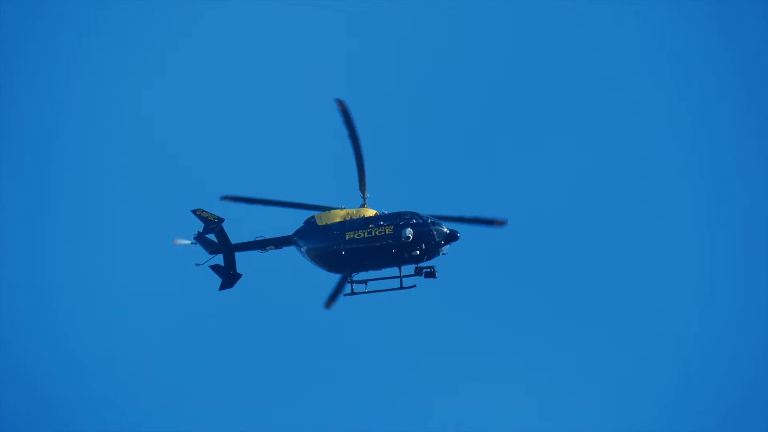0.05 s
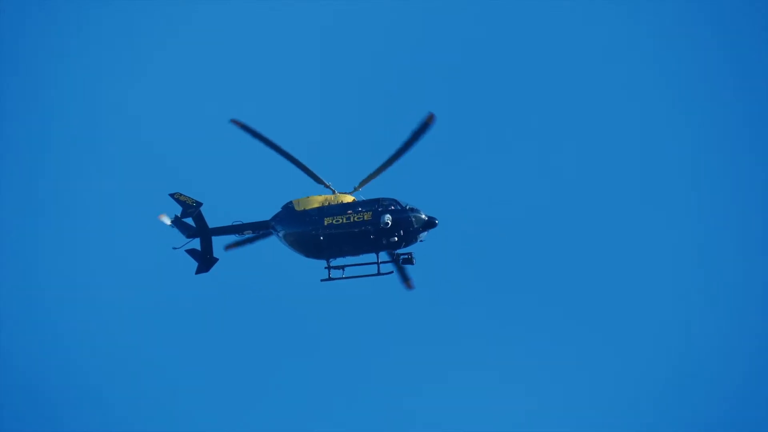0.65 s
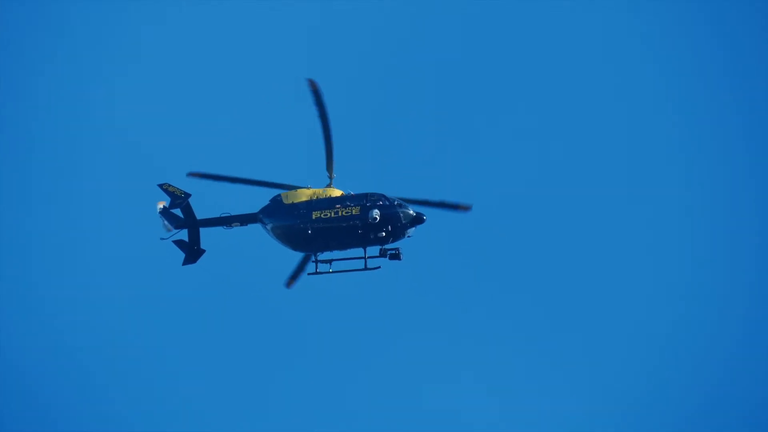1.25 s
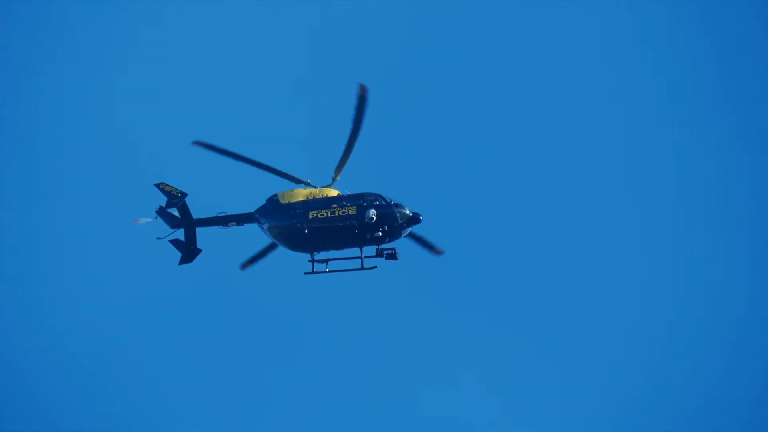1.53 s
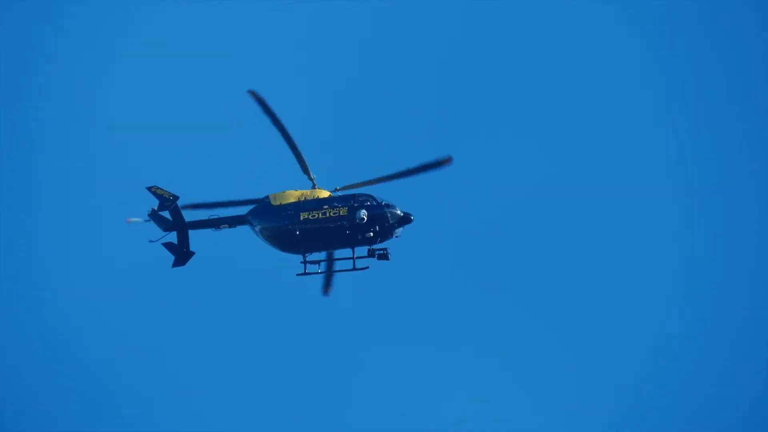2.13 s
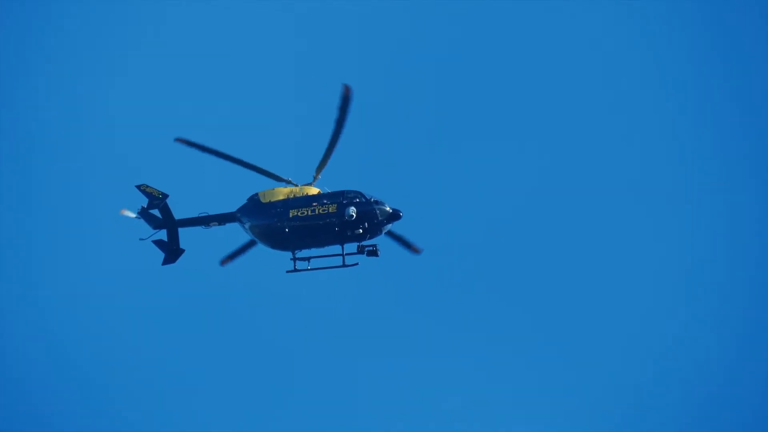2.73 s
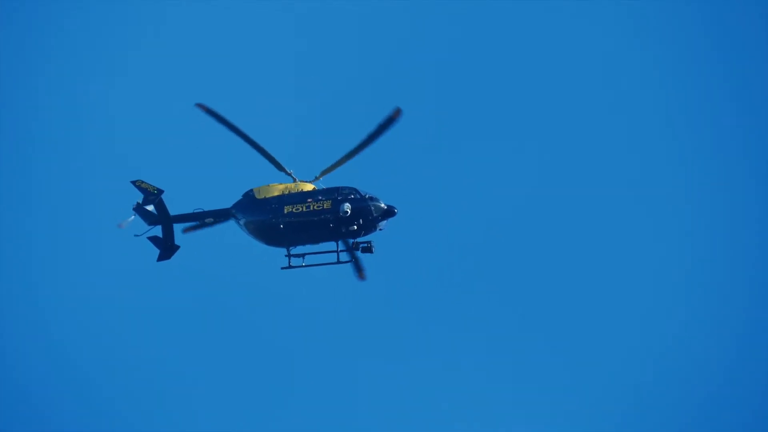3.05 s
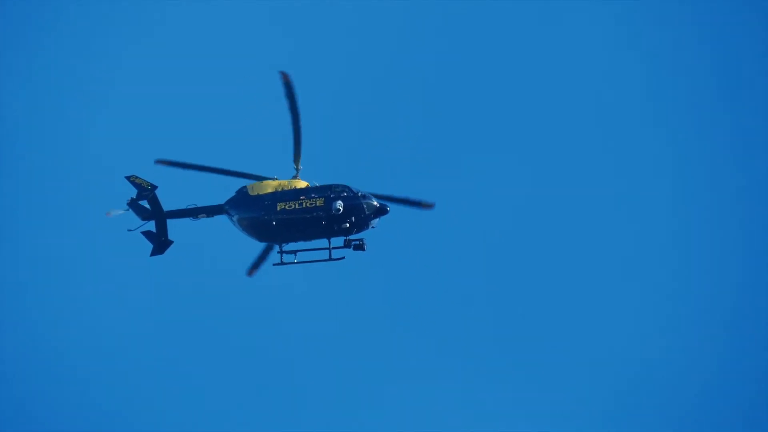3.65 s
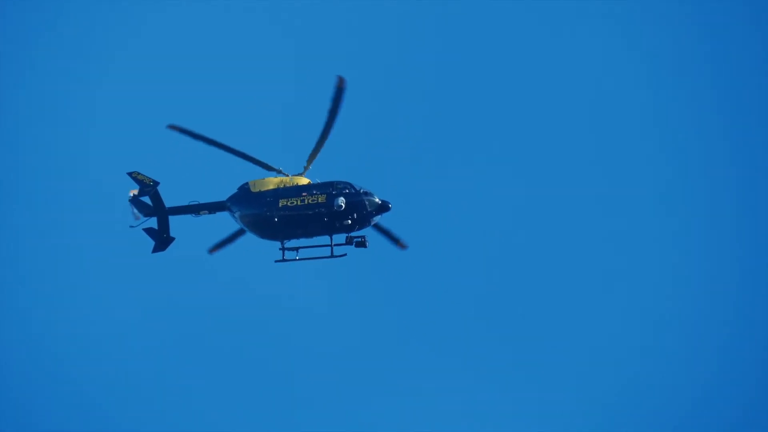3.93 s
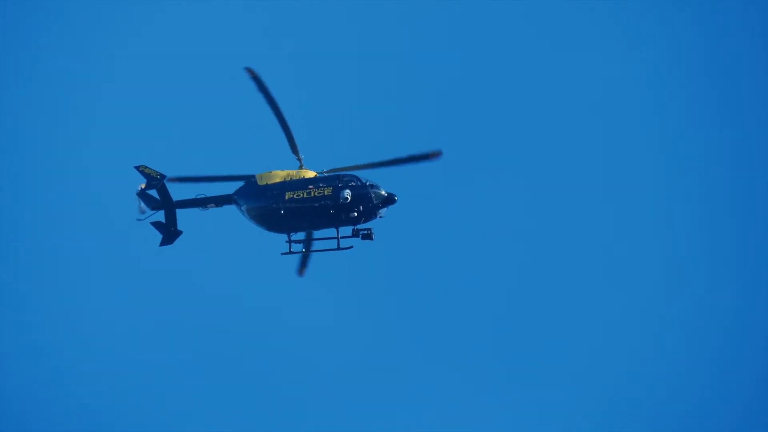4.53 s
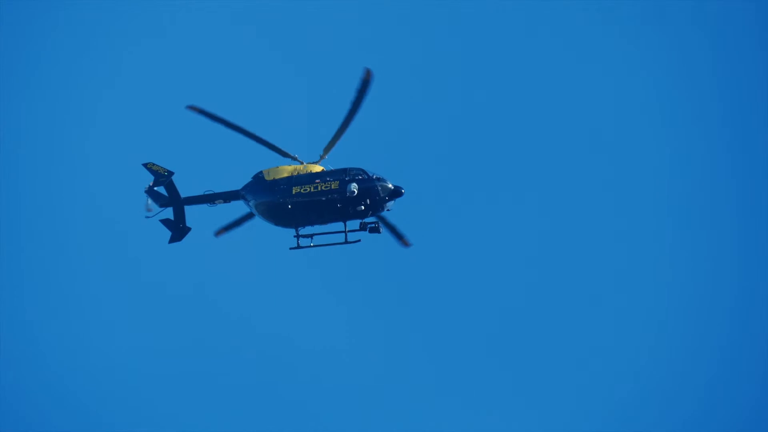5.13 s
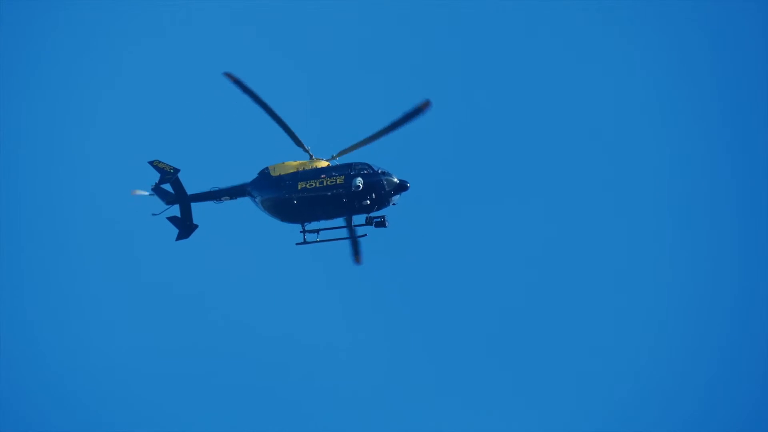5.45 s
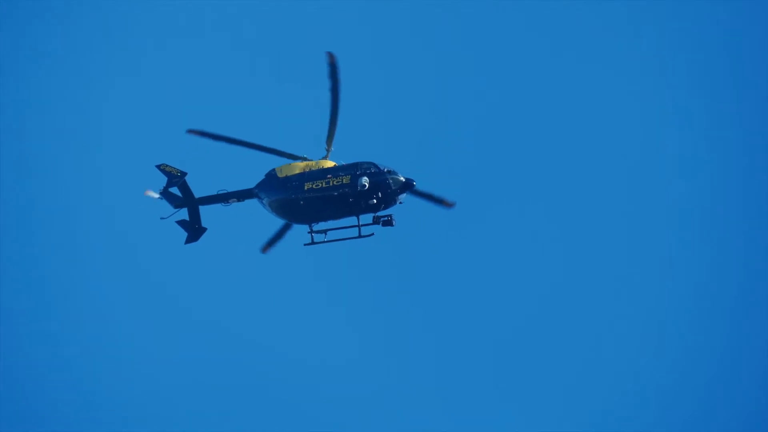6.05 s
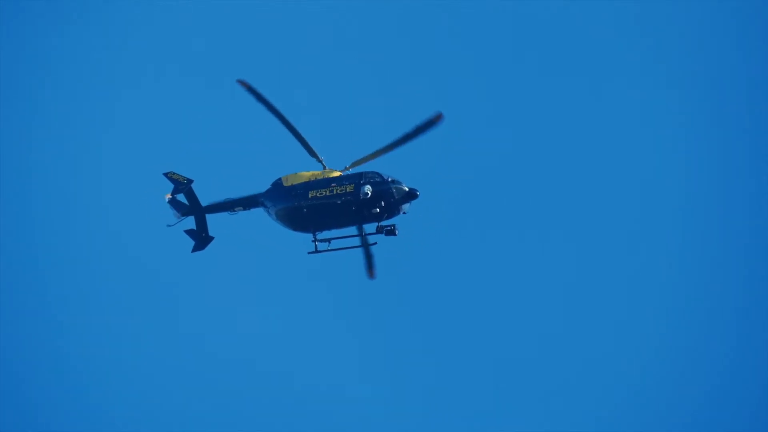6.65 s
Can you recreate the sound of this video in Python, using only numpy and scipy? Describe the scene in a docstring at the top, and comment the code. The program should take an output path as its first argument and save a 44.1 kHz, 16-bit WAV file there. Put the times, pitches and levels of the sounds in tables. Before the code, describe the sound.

A helicopter hovers overhead in the open air. Its main rotor throbs and swishes in a rapid chop while the tail rotor hums above it, swelling and easing slightly. Sharp blade slaps come irregularly, clustering around three and five seconds. A small bird chirps very faintly in the distance midway, and a thin zoom motor whir starts close to the microphone for the last two seconds.

```python
"""A helicopter hovers overhead, swaying a little: its main rotor throbs, roars and swishes as the
blades cut turbulent air, and now and then slaps its own wake. The tail rotor drones above the throb.
A small bird chirps far off, and the gears of a camera's zoom motor whir faintly, most near the end."""
import sys
import numpy as np
from scipy import signal
from scipy.fft import rfft, irfft
from scipy.io import wavfile
from scipy.ndimage import uniform_filter1d

SR = 44100
rng = np.random.default_rng(int(sys.argv[2]) if len(sys.argv) > 2 else 0)


def waveform_to_disk(signal):
    """Save audio, clipped to [-1, 1], as 16-bit WAV at the path in sys.argv[1]."""
    frames = np.transpose(np.atleast_2d(signal))
    scaled = np.clip(frames, -1, 1) * 32767
    samples = np.round(scaled).astype(np.int16)
    wavfile.write(sys.argv[1], SR, samples)


N = 298998
TIME, FREQ = np.arange(N) / SR, np.fft.rfftfreq(N, 1 / SR)
MAIN_HZ, TAIL_HZ = 25.78, 72.92  # blade passes a second


def amp(db):
    """Decibels to gain."""
    return 10 ** (np.asarray(db) / 20)


def unit(x):
    """Scales to rms 1."""
    return x / np.sqrt(np.mean(abs(x) ** 2) + 1e-20)


def curves(rows):
    """One envelope for each value column of a time table."""
    times, *columns = np.transpose(rows)
    return [np.interp(TIME, times, c) for c in columns]


def spectra(rows, hz):
    """One curve for each value column of a frequency table, read on a log axis."""
    freqs, *columns = np.transpose(rows)
    return [np.interp(np.log(hz + 1), np.log(freqs + 1), c) for c in columns]


def wander(rate):
    """Smooth random modulation of rms 1 that changes about rate times a second."""
    t = np.linspace(0, N / SR, num=3000)
    hz = rate * np.geomspace(1 / 10, 1, num=12)[:, None]
    waves = np.sin(2 * np.pi * (hz * t + rng.random(hz.shape)))
    return np.interp(TIME, t, unit(waves.sum(0)))


def eddies(grain_db):
    """Two streams of noise broken into grains a few milliseconds long."""
    grains = unit(uniform_filter1d(rng.standard_normal(N), size=110))
    return rng.standard_normal((2, N)) * amp(grain_db * grains)


def churn(pair, shape, patchy_db, drift):
    """A restless EQ, as through turbulent air: the curve slides to and fro, patches swell and sink."""
    hz, times, frames = signal.stft(pair, SR, nperseg=1024)
    patches = uniform_filter1d(rng.standard_normal(frames.shape[1:]), size=4, axis=0)
    patches = unit(uniform_filter1d(patches, size=16, axis=1))
    slide = np.exp(drift * np.interp(times, TIME, wander(3)))
    eq_db = spectra(shape, hz[:, None] * slide)[0] + patchy_db * patches
    return signal.istft(frames * amp(eq_db), nperseg=1024)[1][:, :N]


def harmonics(blade_hz, orders, flutter, flutter_rate, start=0):
    """A rotor's partials, scattered in phase; the higher ones flutter more in the disturbed air."""
    out, passes = np.zeros(N), blade_hz * TIME + start
    for k, db in orders:
        stray = flutter * k * (wander(flutter_rate) + 1j * wander(flutter_rate))
        partial = np.exp(2j * np.pi * (k * passes + 0.5 * rng.random()))
        out += amp(db) * unit(((1 + stray) * partial).real)
    return out


# stereo image of the two microphone ports: f/Hz, coherence, left lead/rad, left minus right/dB
STEREO_IMAGE = [(450, .98, .15, .5), (650, .89, .4, 1.2), (900, .78, .2, 5), (1150, .6, -1, 4.4),
                (1400, .6, -.3, 1.6), (1700, .2, -2.2, 0), (2000, .55, -.3, -2.7), (2900, .28, -2.3, 2),
                (4500, .18, -.8, -2)]

def mic_ports(pair):
    """Two unrelated sounds become left and right: mono in the bass, wide in the treble."""
    coherence, phase, tilt_db = spectra(STEREO_IMAGE, FREQ)
    width = 1 - np.exp(-(FREQ / 400) ** 3)
    shared = 1 - width * (1 - np.clip(coherence, 0, 1))
    left, other = rfft(pair)
    right = (shared * left + np.sqrt(1 - shared ** 2) * other) * np.exp(-1j * phase * width)
    tilt = amp(width * tilt_db / 2)
    return irfft(np.array([left * tilt, right / tilt]), N)


# distant chirps: t/s, length/s, top pitch/Hz, level/dB
CHIRPS = [(0.25, 0.16, 6300, -83), (3.73, 0.22, 6300, -72)]

def bird(waver=.035, top_s=0.04, bend_hz_per_s2=44000, ramp_s=0.014, fade_db=-12):
    """Thin, hoarse whistles that reach their top pitch early, then fall and fade."""
    out = np.zeros(N)
    hoarse = 1 + waver * unit(uniform_filter1d(rng.standard_normal(N), size=30))
    for start, length, top_hz, db in CHIRPS:
        t = np.clip(TIME - start, 0, length)
        hz = top_hz - bend_hz_per_s2 * (t - top_s) ** 2
        gate = np.minimum(np.minimum(t, length - t) / ramp_s, 1)
        whistle = unit(np.sin(2 * np.pi * np.cumsum(hz * hoarse) / SR))
        out += gate * amp(db + fade_db * (t / length) ** 2) * whistle
    return out


# gear whine of each motor run: t/s, length/s, level/dB
ZOOM_RUNS = [(0, 1.4, -76), (4.91, 2.3, -62.5), (5.14, .3, -67.5)]
# rush of each fast lens move: t/s, length/s, level/dB
LENS_SPURTS = [(.04, .075, -83), (5.013, .16, -63), (6.652, .19, -62)]
# resonances of the lens housing: f/Hz, width/Hz, relative level/dB
HOUSING_MODES = [(4680, 350, 1), (5200, 60, 3), (9070, 480, -14.5), (11050, 1100, -16)]
# EQ of the moving lens's rush: f/Hz, gain/dB
RUSH_EQ = [(3500, -10.5), (4800, -0.5), (6300, -2), (8500, 0), (11300, -3.5), (14500, -25.5)]

def zoom_motor(attack_s=.06, fade_db_per_s=3.5, spurt_ramp_s=0.041, rattle_db=3.5, glide_db=-7):
    """Tiny gear teeth rattle the housing into a slowly fading whine; the moving lens adds a rush."""
    whine_gain, spurt_gain = np.zeros((2, N))
    for start, length, db in ZOOM_RUNS:
        since = np.maximum(TIME - start, 0)
        whine_gain += np.minimum(since / attack_s, 1) * amp(db - fade_db_per_s * since) * (since < length)
    for start, length, db in LENS_SPURTS:
        inside_s = np.minimum(TIME - start, start + length - TIME)
        spurt_gain += amp(db) * np.clip(inside_s / spurt_ramp_s, 0, 1)
    mid, side = eddies(grain_db=0.5) * amp(1.6 * wander(110))
    teeth = mid + 0.61 * np.array([side, -side])
    ringing = 0
    for hz, width, db in HOUSING_MODES:
        rattle = teeth * amp(rattle_db * wander(140))
        ringing += rfft(rattle) * amp(db) / (1 + (2 * (FREQ - hz) / width) ** 2)
    rush = unit(churn(teeth, RUSH_EQ, patchy_db=3.0, drift=.015))
    return unit(irfft(ringing, N)) * whine_gain + rush * (spurt_gain + amp(glide_db) * whine_gain)


# tail rotor partials: harmonic number, level/dB
TAIL_PARTIALS = [(1, -53.5), (2, -40.5), (4, -42), (5, -38.5), (6, -38.5), (7, -40)]
# envelope of the drone, the tail rotor's third harmonic: t/s, level/dB
DRONE_LEVEL = [(0.54, -28.5), (1.42, -22.5), (1.51, -31.5), (1.72, -23), (2.48, -22), (3.07, -22),
               (3.15, -29), (3.3, -33.5), (3.46, -21), (3.78, -26.5), (3.95, -25.5), (4.24, -34.5),
               (4.33, -21.5), (4.42, -37.5), (4.48, -22), (4.66, -19), (4.87, -27.5), (5.2, -30),
               (5.38, -24.5), (5.66, -27), (5.8, -35)]

def tail_rotor():
    """Fast pressure pulses merge into a hum; its third harmonic fades in and out on the way down."""
    hum = harmonics(TAIL_HZ, TAIL_PARTIALS, flutter=0.14, flutter_rate=7.0)
    drone = harmonics(TAIL_HZ, [(3, 0)], flutter=0.07, flutter_rate=11.0)
    return hum + drone * amp(curves(DRONE_LEVEL)[0])


# sway of the main rotor disc: t/s, lead of the beat/blade passes, chop depth factor
DISC_SWAY = [(0.0, 0.31, 1.1), (0.94, 0.55, 0.84), (2.31, 0.66, 0.95), (2.67, 0.78, 0.98),
             (3.45, 0.79, 0.64), (3.87, 0.44, 0.73), (5.29, 0.74, 1), (5.57, 0.55, 0.8), (6.15, 0.58, 1.2),
             (6.76, 0.34, 0.36)]

def blade_chop(lead, depth_db, skew, peak, uneven_db):
    """Gain that rises quickly as each blade comes round and sinks more slowly; no two passes match."""
    disc_lead, chop = curves(DISC_SWAY)
    passes = MAIN_HZ * TIME + disc_lead + lead
    angle = 2 * np.pi * passes
    beat = np.cos(angle) - skew * np.sin(2 * angle) + peak * (np.cos(2 * angle) + np.cos(3 * angle) / 2)
    accent = rng.standard_normal(N)[np.round(passes).astype(int)]
    return amp(chop * (depth_db * beat + uneven_db * accent * (1 + np.cos(angle)) / 2))


# blade loading, swelling and easing in the hover: t/s, wake fader/dB, swish fader/dB
BLADE_LOAD = [(0.0, -21.5, -30.5), (0.5, -25.5, -28.5), (0.68, -22, -29), (0.94, -22, -31.5),
              (1.34, -17.5, -30.5), (1.55, -19.5, -28), (1.82, -17, -26.5), (2.55, -18, -27),
              (3.15, -20.5, -30.5), (3.5, -21, -31.5), (3.97, -18, -27), (4.15, -15.5, -27.5),
              (4.47, -18.5, -27), (4.69, -18.5, -27.5), (5.09, -22.5, -31.5), (5.6, -22, -28.5),
              (6.03, -22.5, -29), (6.45, -25, -32)]
# EQs of the wake's roar and the blades' swish: f/Hz, gain/dB
ROAR_EQ = [(40, -52.5), (85, -25), (125, -18.5), (165, -7.5), (200, -5.5), (260, -2), (350, 1), (500, 0),
           (570, -9.5), (750, -13), (1100, -23), (3000, -87.5)]
SWISH_EQ = [(300, -34.5), (600, 3), (780, -2), (1020, -5), (1160, -2), (1270, -10), (1450, -4.5),
            (1650, -10.5), (2200, -16.5), (2650, -24), (3200, -27), (3900, -38), (5000, -45), (6000, -61),
            (9000, -88)]

def rotor_wash():
    """Blades cut turbulent air: a low roar and a brighter swish, both chopped at the blade rate."""
    wake_db, swish_db = curves(BLADE_LOAD)
    roar = eddies(grain_db=-0.6)
    roar *= blade_chop(lead=0.038, depth_db=3.0, skew=0.23, peak=0.048, uneven_db=0.5)
    roar = unit(churn(roar, ROAR_EQ, patchy_db=1.5, drift=0.031))
    swish = eddies(grain_db=0.72)
    swish *= blade_chop(lead=-0.024, depth_db=2.5, skew=0.14, peak=0.05, uneven_db=0.74)
    swish = unit(churn(swish, SWISH_EQ, patchy_db=2.0, drift=0.0082))
    return roar * amp(wake_db - 4.0) + swish * amp(swish_db - 1.5)


# envelope of the blade tips' hiss: t/s, level/dB
TIP_LEVEL = [(0.75, -53), (1.02, -39.5), (1.33, -48), (1.57, -42.5), (2.3, -49.5), (2.64, -37),
             (3.0, -43.5), (3.48, -53), (3.7, -39.5), (4.95, -49.5), (5.08, -41), (5.5, -47.5), (5.85, -46),
             (6.25, -46.5), (6.76, -55.5)]

def tip_hiss(base_hz=2214, sag_hz_per_pass=418.8, rise_hz_per_db=28, width_hz=150):
    """The blade tips hiss in a narrow band that sinks as the disc tilts and rises with the swish."""
    disc_lead, swish_db = curves(DISC_SWAY)[0], curves(BLADE_LOAD)[1]
    centre_hz = base_hz - sag_hz_per_pass * disc_lead + rise_hz_per_db * (swish_db - swish_db.mean())
    low_noise = irfft(rfft(eddies(grain_db=4.0)) * np.exp(-(FREQ / width_hz) ** 2 / 2), N)
    hiss = low_noise * np.cos(2 * np.pi * np.cumsum(centre_hz) / SR)
    hiss *= blade_chop(lead=0.027, depth_db=6.5, skew=0.18, peak=0.065, uneven_db=1.5)
    return unit(hiss) * amp(curves(TIP_LEVEL)[0])


# main rotor partials, low throb and higher buzz: harmonic number, relative level/dB
THROB_PARTIALS = [(2, -34.5), (3, -17.5), (4, -7), (5, -3)]
BUZZ_PARTIALS = [(6, -14.5), (7, -17.5), (9, -21.5), (10, -12.5), (14, -19.5)]
# envelope of the throb: t/s, fader/dB
THROB_LEVEL = [(0.0, -44), (1.3, -37), (3.05, -31), (4.15, -37), (4.65, -39), (5.5, -35), (6.76, -36.5)]

def main_rotor():
    """The big blades' pressure pulses: a deep throb, and a buzz that follows the blade loading."""
    throb = harmonics(MAIN_HZ, THROB_PARTIALS, flutter=0.057, flutter_rate=5.0, start=0.62)
    buzz = harmonics(MAIN_HZ, BUZZ_PARTIALS, flutter=0.057, flutter_rate=5.0, start=0.62)
    return throb * amp(curves(THROB_LEVEL)[0]) + buzz * amp(curves(BLADE_LOAD)[0])


def pulse(shape, tail_db, decay_s):
    """A coloured pressure spike with a turbulent tail, centred in its frame; loudest 3 ms at rms 1."""
    t = np.arange(-SR // 20, SR // 20) / SR
    tail = rng.standard_normal((2, len(t))) * np.exp(-abs(t) / decay_s) * (t > 0)
    burst = unit(1.0 * (t == 0)) + amp(tail_db) * unit(tail)
    phase_turn = np.exp(2j * np.pi * rng.random((2, 1)))
    eq_db = spectra(shape, np.fft.rfftfreq(len(t), 1 / SR))[0]
    burst = irfft(rfft(burst) * phase_turn * amp(eq_db))
    return burst / np.sqrt(uniform_filter1d(burst ** 2, size=130).max(1, keepdims=True))


# EQs of a slap's three layers: f/Hz, gain/dB
THUD_EQ = [(100, -38.5), (240, -5), (420, -2), (650, -9.5), (1400, -40.5), (6000, -110)]
CRACK_EQ = [(400, -16.5), (800, 11), (1450, 1), (2000, -16.5), (2700, -28.5), (4500, -44.5), (8000, -87.5)]
ZING_EQ = [(1200, -40), (1800, -0.5), (2050, -1), (2700, -33.5), (6000, -83)]
# hard blade slaps: t/s, thud level/dB, crack level/dB, zing level/dB
SLAPS = [(1.177, -19.5, -32.5, -34.5), (1.53, -25, -38.5, -33.5), (1.574, -25, -24, -29),
         (1.792, -16, -31, -40.5), (2.489, -14.5, -30.5, -39.5), (2.607, -26, -33, -30.5),
         (2.643, -27.5, -26, -26.5), (2.721, -14, -19.5, -29), (2.837, -26, -36, -33),
         (2.875, -15.5, -28, -36.5), (2.915, -19.5, -24.5, -42.5), (2.956, -27, -27.5, -27.5),
         (3.033, -17.5, -34.5, -35.5), (3.2212, -24.5, -28, -46.5), (3.304, -21, -42, -51),
         (4.211, -18.5, -29, -43.5), (4.475, -26, -22, -37.5), (4.635, -15.5, -30.5, -43),
         (4.7475, -9.5, -28, -50.5), (4.9, -17.5, -30.5, -39), (4.9353, -13.5, -36, -54),
         (4.974, -25, -22.5, -44), (5.051, -19.5, -25.5, -32.5), (5.128, -23.5, -33.5, -30.5),
         (5.282, -24, -24, -32.5), (5.322, -21, -30.5, -41.5), (5.3589, -17.5, -23.5, -34),
         (5.674, -18, -31, -38.5), (5.876, -20.5, -34.5, -26), (6.028, -25, -37, -37.5),
         (6.26, -29, -33.5, -32.5), (6.646, -19, -37.5, -51.5)]

def blade_slaps(echo_db=-12.0, echo_s=0.0095):
    """A blade strikes the vortex of the one before: thud, crack and tip zing, echoed by the ground."""
    out = np.zeros((2, N))
    for t, thud_db, crack_db, zing_db in SLAPS:
        slap = amp(thud_db) * pulse(THUD_EQ, tail_db=-1.5, decay_s=0.006)
        slap += amp(crack_db) * pulse(CRACK_EQ, tail_db=6, decay_s=0.0028)
        slap += amp(zing_db) * pulse(ZING_EQ, tail_db=6, decay_s=0.0035)
        length = slap.shape[1]
        first = int(t * SR) - length // 2
        out[:, first:first + length] += slap
    return out + amp(echo_db) * np.roll(out, int(echo_s * SR), axis=1)


def scene():
    """The mix: blade noise spread in stereo, rotor tones and bird in the centre, plus the zoom motor."""
    soft_ends = signal.windows.tukey(N, .002)
    blade_noise = (rotor_wash() + tip_hiss() + blade_slaps()) * soft_ends
    return mic_ports(blade_noise) + main_rotor() + tail_rotor() + bird() + zoom_motor()


def record(dry):
    """Faint microphone hiss, then a steep high cut at 15.1 kHz."""
    hiss = amp(-81.5) * rng.standard_normal(N)
    high_cut = signal.ellip(10, .05, 70, 15100, fs=SR, output="sos")
    return signal.sosfiltfilt(high_cut, dry + hiss)


dry = scene()
out = record(dry)
waveform_to_disk(out)
```